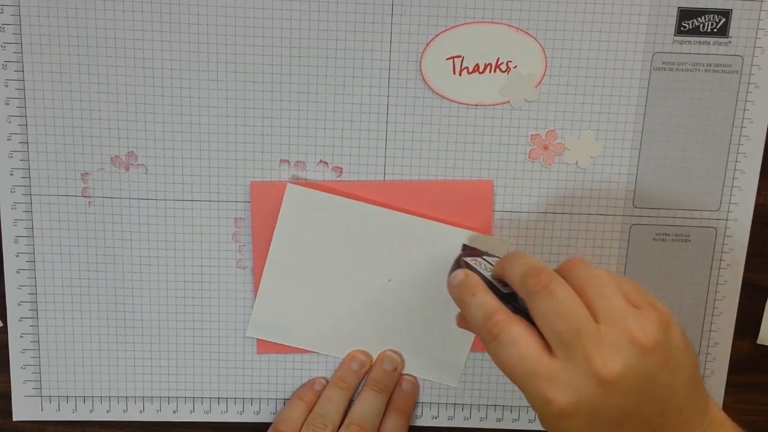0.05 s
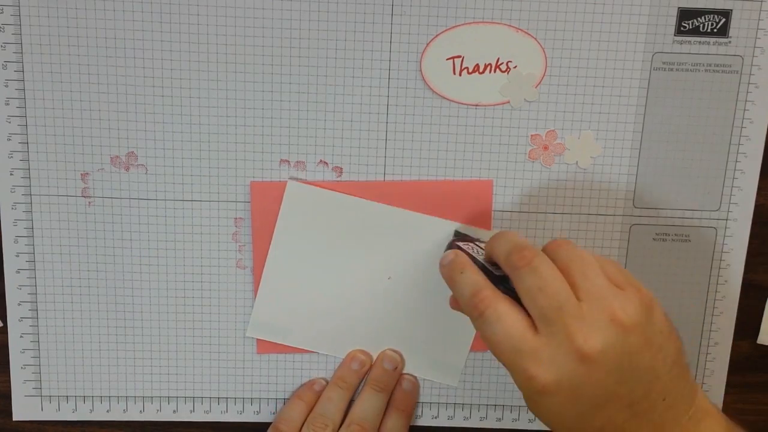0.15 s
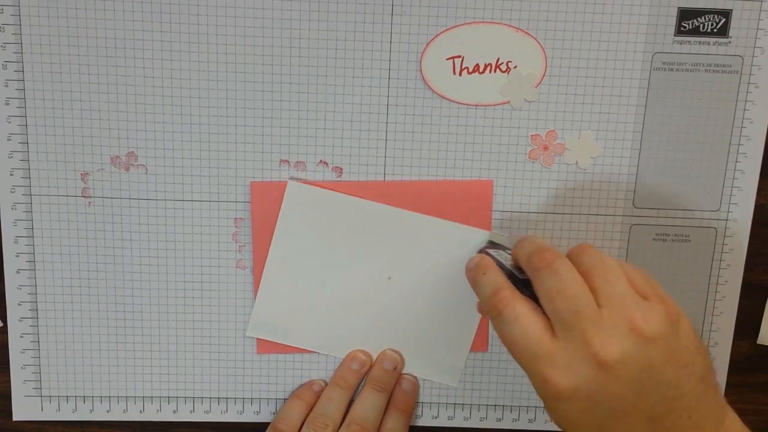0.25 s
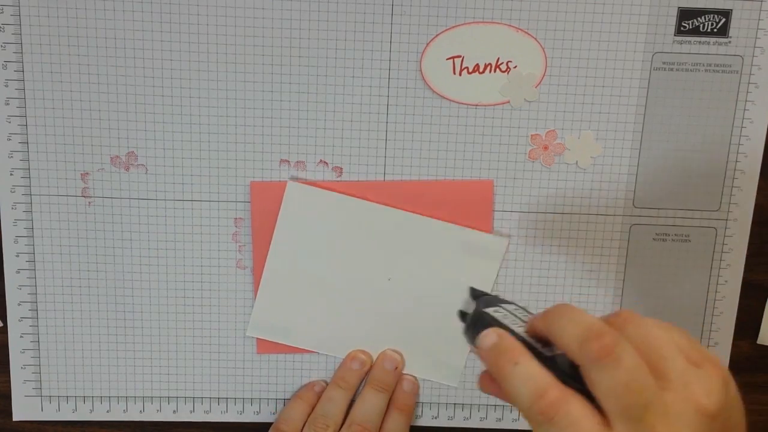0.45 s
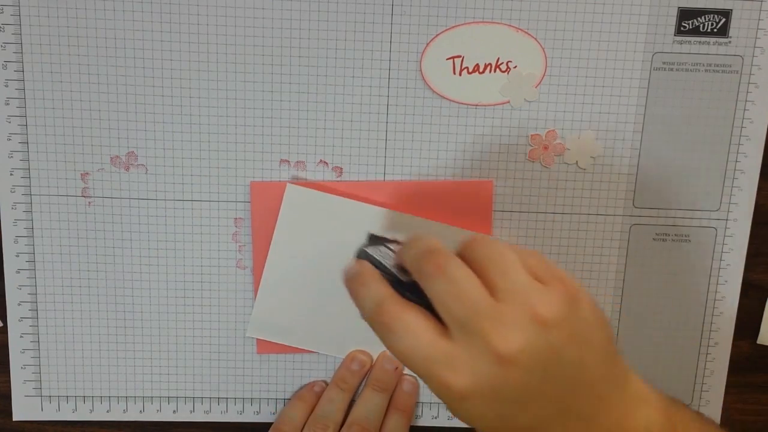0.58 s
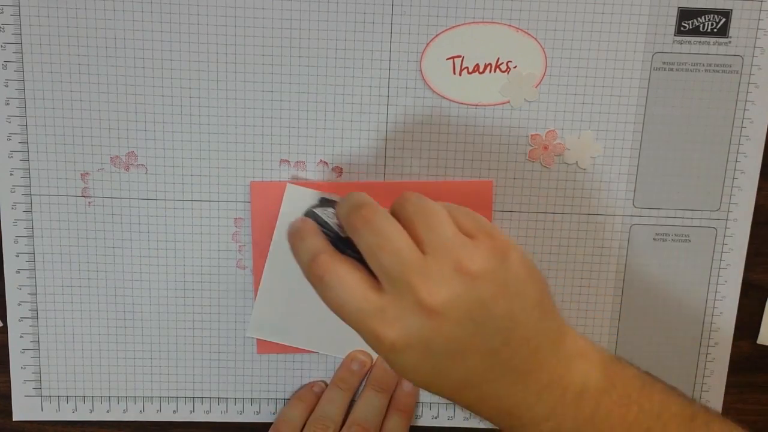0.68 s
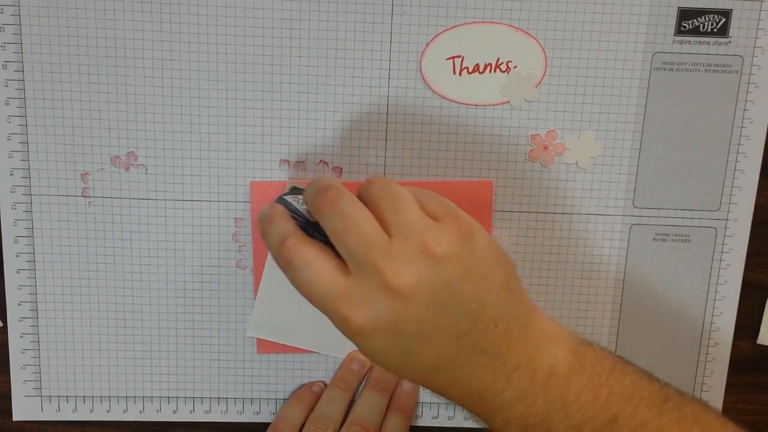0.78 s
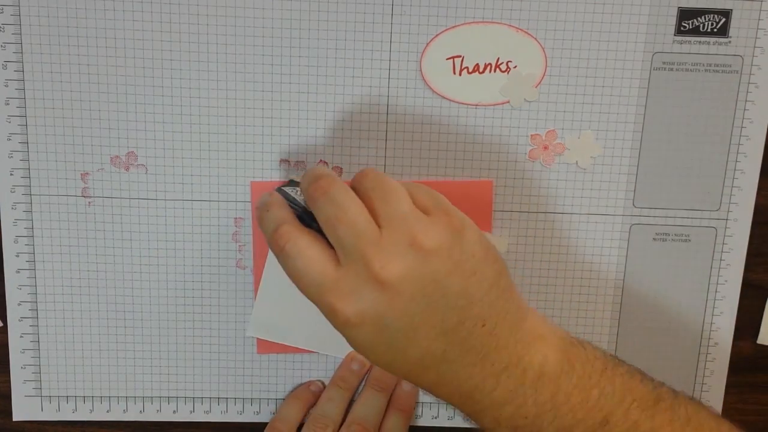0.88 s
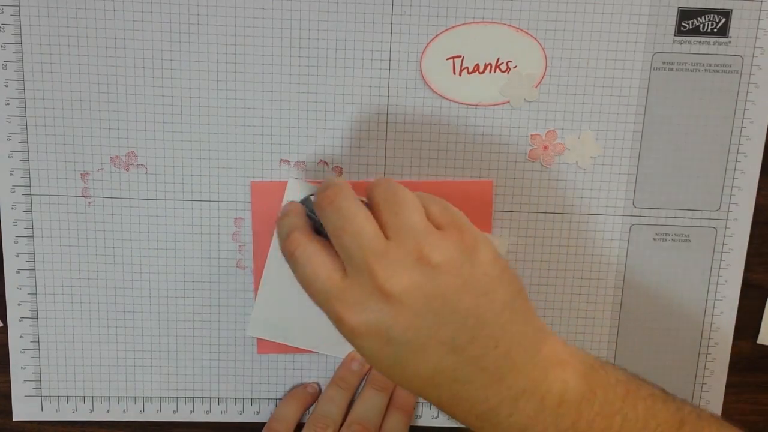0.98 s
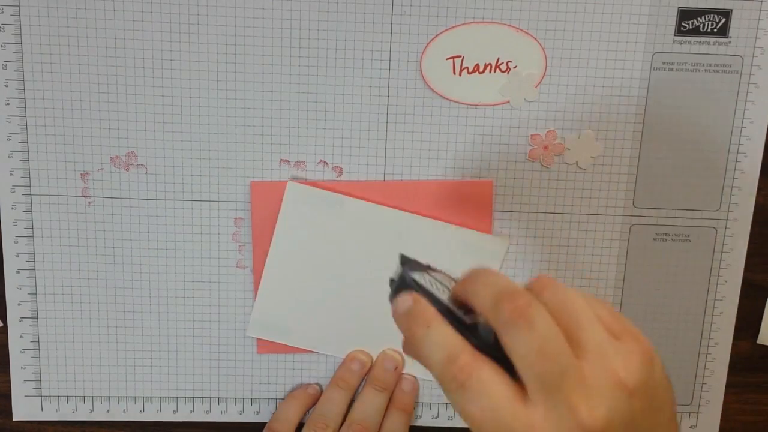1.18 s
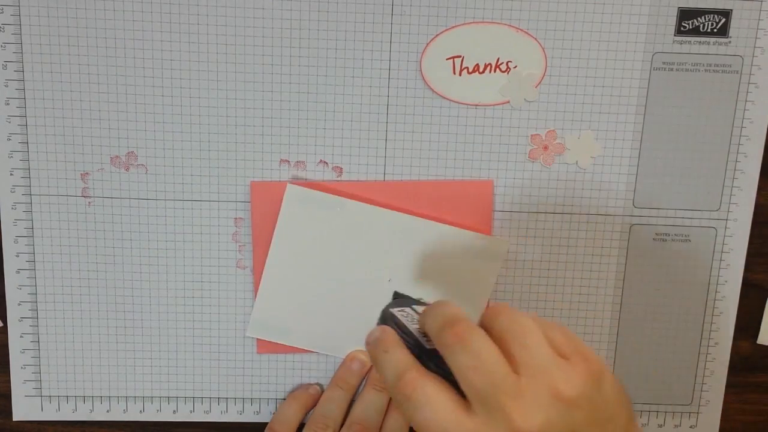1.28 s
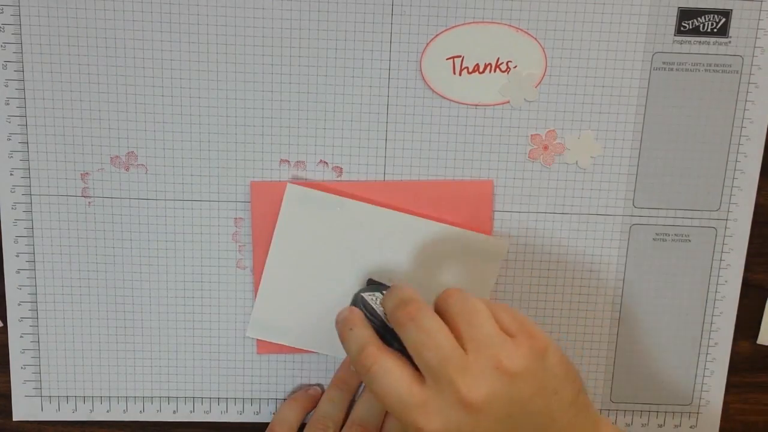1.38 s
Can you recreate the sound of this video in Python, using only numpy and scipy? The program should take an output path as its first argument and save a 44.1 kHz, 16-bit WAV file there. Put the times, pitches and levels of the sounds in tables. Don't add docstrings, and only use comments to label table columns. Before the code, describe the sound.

Close up, a glue tape runner presses down with a dull table thump and zips with hard dense ticks, lifts with a soft scuff and tiny rattles, then makes a second, somewhat softer stroke in a small room.

```python
import sys
import numpy as np
from scipy import signal
from scipy.fft import rfft, irfft, next_fast_len
from scipy.io import wavfile
from scipy.ndimage import uniform_filter1d

SR = 44100
rng = np.random.default_rng(int(sys.argv[2]) if len(sys.argv) > 2 else 0)


def voltage_ratio(level):
    return 10 ** (np.asarray(level, float) / 20)


def generate_wav(signal):
    frames = np.transpose(np.atleast_2d(signal))
    scaled = np.clip(frames, -1, 1) * 32767
    pcm = np.round(scaled).astype(np.int16)
    wavfile.write(sys.argv[1], SR, pcm)


N = 63945

# hz, level_db (per Hz)
GLUE_SPECTRUM = [(300, -41.5), (1200, -17.5), (1600, -1), (2700, -3), (6600, -1), (10000, -10),
                 (15400, -21.5), (16000, -48.5)]


def read(points, hz):
    f, value = np.transpose(points)
    return np.interp(np.log(hz + 1), np.log(f + 1), value)


def curve(points):
    return voltage_ratio(np.interp(np.arange(N) / SR, *np.transpose(points), left=-120, right=-120))


def evened(x):
    return x / np.sqrt(np.mean(x ** 2) + 1e-20)


def add(mix, s, sound):
    part = mix[round(s * SR):][:len(sound)]
    part += sound[:len(part)]


def colour(x, db_points):
    hz = np.fft.rfftfreq(4096, 1 / SR)
    half = np.log(voltage_ratio(read(db_points, hz)))
    full = np.concatenate([half, half[-2:0:-1]])
    taps = np.fft.ifft(np.exp(full - 1j * signal.hilbert(full).imag)).real[:2048]
    return signal.oaconvolve(x, taps)[:len(x)]


def resonate(x, hz, width_hz):
    turn = np.exp(2j * np.pi * hz * np.arange(len(x)) / SR)
    r = np.exp(-np.pi * width_hz / SR)
    return 2 * (turn * signal.lfilter([1 - r], [1, -r], x / turn)).real


def ding(hz, db, t60, rise):
    t = np.arange(5000) / SR
    return voltage_ratio(db - 60 * t / t60) * np.minimum(t / rise, 1) * np.sin(2 * np.pi * hz * t)


def floor():
    # hz, level_db (per Hz)
    hiss = [(20, -22), (56, 3), (85, -6), (180, -5.5), (673, -15.5), (4000, -21), (7840, -16.5),
            (12600, -24.5), (15800, -22)]
    # hz, likeness (-1 to 1)
    likeness = [(60, 0.81), (240, 0.38), (950, 0.094), (3770, 0.091), (15000, 0.46)]
    level_db = -62.5
    frames, hz = N // 256 + 5, np.fft.rfftfreq(1024, 1 / SR)
    a, b, c, d = rng.standard_normal((frames, 513, 4)).T
    same = np.clip(read(likeness, hz), -1, 1)[:, None]
    left = a + 1j * b
    right = same * left + np.sqrt(1 - same ** 2) * (c + 1j * d)
    bands = np.array([left, right]) * voltage_ratio(read(hiss, hz))[:, None]
    noise = signal.istft(bands, nperseg=1024, noverlap=768)[1][:, :N]
    return voltage_ratio(level_db) * evened(noise) * voltage_ratio(np.array([[-1.5], [1.5]]))


def whine():
    # time_s, pitch_hz
    drift = [(0, 1561.5), (.6, 1559), (1.0, 1559), (1.25, 1542), (1.45, 1542)]
    # multiple, level_db
    overtones = [(4, -75), (5, -66.5), (6, -66.5), (7, -70.5), (8, -69), (9, -74.5), (10, -78)]
    left_db, waver_db = -30, 0.6
    mains_hz, mains_db = 59, -73
    t = np.arange(N) / SR
    turns = np.cumsum(np.interp(t, *np.transpose(drift))) / SR
    noise = rng.standard_normal((len(overtones), N))
    waver = [evened(uniform_filter1d(uniform_filter1d(v, 1500), 1500)) for v in noise]
    tone = np.zeros(N)
    for (k, db), w in zip(overtones, waver):
        tone += voltage_ratio(db + 5.0 + waver_db * w) * np.sin(2 * np.pi * (round(k) * turns + rng.random()))
    mains = voltage_ratio(mains_db + 3 + 2 * waver[0]) * np.sin(2 * np.pi * mains_hz * t)
    return tone * voltage_ratio(np.array([[left_db], [0]])) + mains


def room(x):
    # hz, t60_s
    decay = [(150, 1), (1000, 0.34), (3000, 0.34), (7000, 0.32), (14000, 0.28)]
    taps = np.zeros((2, SR // 2))
    at = np.arange(200, SR // 2 - 20, 20)
    at = at + rng.integers(0, 20, (2, len(at)))
    np.put_along_axis(taps, at, rng.choice([-1., 1.], at.shape), 1)
    hz, t, z = signal.stft(taps, SR, nperseg=256)
    tail = signal.istft(z * voltage_ratio(-60 * t / read(decay, hz)[:, None]), SR, nperseg=256)[1]
    return signal.fftconvolve(x[None], tail / np.linalg.norm(tail[0]), axes=1)[:, :N]


def pair(x):
    # hz, left_minus_right_db
    lean = [(200, 1.5), (1650, 3), (5000, 3.5), (7000, 1.5), (9000, -6), (15000, -3.5)]
    # hz, share (0 to 1)
    direct = [(700, 0.9), (1500, 0.8), (4000, 0.69), (9000, 0.74)]
    # hz, left_lead_rad
    lead = [(300, 0), (900, -.4), (1700, -1.7), (2600, -.6), (4500, -.8), (6800, -1.5), (12000, -1)]
    moves_per_s = 9
    taps = rng.standard_normal((2, 300)) * voltage_ratio(-60 * np.arange(300) / 300)
    size = next_fast_len(N + 4096)
    turn = np.pi * moves_per_s * np.arange(N) / SR
    hz, paths = np.fft.rfftfreq(size, 1 / SR), rfft(taps, size)
    parts = rfft(x * np.array([np.sin(turn), np.cos(turn)]), size)
    power = abs(paths) ** 2
    sideways = (paths / np.sqrt(power + 0.29 * np.mean(power)) * parts).sum(axis=0)
    c = np.sqrt(np.clip(read(direct, hz), 0, 1))
    tilt = voltage_ratio(read(lean, hz) / 2) * np.exp(.5j * read(lead, hz))
    both = rfft(x, size) * c + np.sqrt(1 - c ** 2) * sideways * [[1], [-1]]
    return irfft(both * [tilt, 1 / tilt], size)[:, :N]


def hand_scuff():
    # time_s, level_db
    brush = [
        (.39, -134),
        (.415, -45.5),
        (.45, -56.5),
        (.5, -54),
        (.56, -63),
        (.6, -90),
    ]
    # hz, level_db
    tone = [(60, -33), (110, 7), (230, 6), (330, 1.5), (500, 3), (700, -0.5), (1200, -16)]
    return curve(brush) * evened(colour(rng.standard_normal(N), tone))


def card():
    # start_s, level_db, pitch_hz, t60_s
    buckles = [(0.17, -54.5, 770, 0.065), (0.187, -41, 970, 0.022), (.1985, -41, 860, 0.0089),
               (.2152, -22.5, 930, 0.01), (.253, -39.5, 750, 0.019), (0.291, -46, 945, 0.034),
               (.358, -31.5, 846, 0.024), (.415, -32.5, 963, 0.021), (.492, -50, 695, 0.07),
               (0.906, -51, 986, 0.028), (0.924, -32.5, 1240, 0.066), (.923, -43, 670, 0.036),
               (0.9247, -28, 1673, 0.037), (.967, -36, 1720, .04), (.987, -32, 1690, 0.05),
               (1.012, -39.5, 727, 0.073), (1.078, -35, 807, 0.037)]
    out = np.zeros(N)
    for s, db, hz, t60 in buckles:
        add(out, s, ding(hz, db, t60, 0.0022))
    return out


def casing(x):
    # pitch_hz, width_hz, level_db
    shell = [(1250, 460, -2.5), (1720, 332, -1), (2640, 610, -6), (4260, 990, 4.5), (5140, 1100, -4),
             (6600, 502, 7.5), (7254, 1200, 2)]
    return sum((-1) ** k * voltage_ratio(db) * resonate(x, f, w) for k, (f, w, db) in enumerate(shell))


def spool_hum():
    # time_s, level_db
    spin = [(.915, -80), (.926, -44), (.945, -50), (.99, -46), (1.1, -50), (1.2, -57), (1.23, -66),
            (1.33, -72), (1.36, -100)]
    hz, width_hz = 1700, 60
    hum = resonate(resonate(rng.standard_normal(N), hz, width_hz), hz, 3 * width_hz)
    return curve(spin) * evened(hum)


def rattles():
    # start_s, peak_db, low_ring_hz, hub_ring_db, upper_rings_db
    knocks = [(.531, -41, 1630, -28, -28), (.542, -50, 1650, -20, -20), (.603, -54, 1700, -20, -20),
              (0.6105, -49, 1750, 1, -7), (.615, -58, 1700, -20, -20), (0.62, -52, 1650, -4, -4),
              (.651, -48, 1800, -20, -20), (0.6553, -31.5, 1790, -18, -24), (.6605, -43, 1800, -6, -15),
              (.67, -51, 1600, -15, -20), (.708, -52, 1720, -20, -20), (1.3462, -45, 1770, -14, 4)]
    # pitch_hz, level_db, t60_s
    spool = [(3700, -1, .016), (4400, -3, .018), (4900, -2, .012), (6200, -9, .01), (6750, -8, .01)]
    hub_hz, ring_t60_s, rise_s = 2700, 0.013, 0.0015
    out, t = np.zeros(N), np.arange(800) / SR
    for s, db, hz, hub_db, upper_db in knocks:
        add(out, s, ding(hz, db, ring_t60_s, rise_s))
        add(out, s, ding(hub_hz, db + hub_db, ring_t60_s, rise_s))
        for (f, g, t60), detune in zip(spool, rng.uniform(0.95, 1.01, len(spool))):
            add(out, s, ding(f * detune, db + upper_db + g, t60, rise_s))
        rustle = evened(casing(rng.standard_normal(800)))
        add(out, s, voltage_ratio(db + upper_db - 0.5 - 60 * t / 0.038) * rustle)
    return out


def drag():
    # time_s, level_db
    first = [
        (.165, -90),
        (.188, -54),
        (.2, -38.5),
        (.25, -46.5),
        (.27, -35.5),
        (.36, -31.5),
        (.372, -39.5),
        (.43, -41),
        (.56, -59),
    ]
    # time_s, level_db
    second = [
        (0.904, -56.5),
        (0.914, -51.5),
        (.998, -43),
        (1.004, -34.5),
        (1.081, -32),
        (1.105, -36.5),
        (1.139, -41.5),
        (1.24, -54),
        (1.32, -74),
    ]
    earlier_db, fall_db_per_s = -54.5, 368
    return curve(first) + curve(second) + voltage_ratio(earlier_db - fall_db_per_s * np.arange(N) / SR)


def table():
    # pitch_hz, level_db, t60_s
    modes = [(100, -8, .07), (112, -1, .11), (175, -3, .09), (225, -6, .08), (285, -5, .08),
             (480, -17, .05), (750, -16, .05)]
    # start_s, level_db
    thumps = [(0.188, -32), (0.196, -18), (0.207, -17.5), (0.258, -28), (0.272, -21.5), (0.314, -41),
              (0.352, -38), (0.413, -41), (0.91, -26), (0.921, -22), (0.989, -29.5), (1.037, -25),
              (1.077, -36), (1.166, -37.5), (1.22, -37)]
    thump_db, rumble_db = -11.5, -36.5
    t = np.arange(12000) / SR
    ring = sum(voltage_ratio(db - 60 * t / t60) * np.sin(2 * np.pi * hz * t) for hz, db, t60 in modes)
    ring = -ring / abs(ring).max()
    push = voltage_ratio(rumble_db) * drag() * rng.standard_normal(N)
    for s, db in thumps:
        add(push, s, voltage_ratio(db + thump_db) * np.hanning(40) / 20)
    return signal.oaconvolve(push, ring)[:N]


def peel():
    crackle_per_s, spread_db = 3300, 1
    wide_db, bright_power = 6.5, 1.58
    size = voltage_ratio(spread_db * np.minimum(rng.exponential(1, N), 4)) * rng.choice([-1., 1.], N)
    clumps = voltage_ratio(1.0 * evened(uniform_filter1d(rng.standard_normal(N), 150)))
    snaps = size * clumps * (rng.random(N) < crackle_per_s / SR)
    push = drag()
    bright = (push / push.max()) ** (bright_power - 1)
    return push * (evened(casing(snaps)) + voltage_ratio(wide_db) * bright * evened(colour(snaps, GLUE_SPECTRUM)))


def tooth_snaps():
    # start_s, peak_db
    snaps = [(0.2739, -13.5), (0.3233, -18), (0.3542, -11), (0.3979, -17), (.9232, -25), (1.019, -17),
             (1.0189, -20), (1.04, -15), (1.0429, -14), (1.0508, -23), (1.077, -16), (1.1097, -18),
             (1.1206, -19)]
    out, click = np.zeros(N), np.zeros(3000)
    click[0] = 1
    crack = evened(colour(click, GLUE_SPECTRUM)) + voltage_ratio(4.5) * evened(casing(click))
    for (s, db), sign in zip(snaps, rng.choice([-1., 1.], len(snaps))):
        add(out, s, sign * voltage_ratio(db) * crack / abs(crack).max())
    return out


def ticks():
    # start_s, peak_db, loudest_ring_hz, second_ring_hz, snap_db
    first = [(0.199, -19, 1450, 6750, -12), (0.2058, -24, 6940, 4600, -10), (0.2096, -19.5, 1670, 7250, -9),
             (0.215, -12, 1750, 6660, -1.5), (0.253, -18.5, 7330, 4300, -9), (0.2673, -12, 2210, 4620, -1),
             (0.274, -11.5, 6220, 6760, -5), (0.278, -14, 2540, 6800, -1), (0.2847, -28, 6160, 2500, -3),
             (0.2922, -9.5, 6800, 4090, -30), (0.302, -7.5, 6260, 1940, -13),
             (0.3135, -10.5, 4320, 1900, -28), (0.3242, -9.5, 3980, 2790, -16),
             (.332, -9, 4140, 2670, -2.5), (0.3401, -11, 4680, 7250, -0.5), (0.3476, -11, 4150, 2265, -1),
             (0.354, -5.5, 4150, 7000, -1), (0.362, -11.5, 5860, 2560, -6.5), (0.3965, -14, 4980, 6550, 3),
             (0.4148, -19.5, 1980, 4430, 9)]
    # start_s, peak_db, loudest_ring_hz, second_ring_hz, snap_db
    second = [(0.9119, -27.5, 1150, 4740, -21), (0.9192, -28, 1370, 8250, 6),
              (0.9223, -16, 1704, 6600, -7.5), (0.9259, -17, 5040, 1650, -3),
              (0.9288, -25.5, 7000, 1220, -1), (0.9516, -27, 1250, 8300, 3),
              (0.9671, -23.5, 2730, 7060, -16), (.983, -23, 6350, 1200, 0), (0.9855, -18, 1710, 7150, -15),
              (1.0042, -15, 5140, 6560, -12), (1.019, -15, 7050, 2580, -13), (1.0295, -18, 2860, 6600, -6),
              (1.0397, -13.5, 2500, 7230, -3), (1.0425, -10.5, 2370, 7370, -5),
              (1.0514, -13, 6900, 5200, -17), (1.0626, -12, 6870, 2450, -3), (1.0686, -14, 2460, 7100, 8),
              (1.0766, -11, 5650, 7100, -21), (1.0835, -17, 2560, 6100, 6), (1.091, -13.5, 5500, 6630, -12),
              (1.1, -18.5, 6600, 2240, -18), (1.1107, -13, 7460, 8370, -3.5), (1.1132, -18, 7230, 8430, -4),
              (1.1214, -23.5, 7000, 2480, 0)]
    burst_t60_s, tooth_t60_s = 0.036, 0.013
    tick_db, ring_db, second_db, wide_db = -3.5, -1.26, -4, -2
    out, t = np.zeros(N), np.arange(3000) / SR
    for s, db, hz, second_hz, snap_db in first + second:
        burst = rng.standard_normal(len(t)) * np.minimum(t / 0.00067, 1) * voltage_ratio(-60 * t / burst_t60_s)
        ring = ding(hz, 0, tooth_t60_s, 0.00074) + ding(second_hz, second_db, tooth_t60_s, 0.00055)
        snap = colour(burst * (0.27 + voltage_ratio(11.0 - 60 * t / 0.0015)), GLUE_SPECTRUM)
        tick = evened(casing(burst)) + voltage_ratio(ring_db) * evened(ring[:len(t)])
        tick += voltage_ratio(wide_db + snap_db) * evened(snap)
        add(out, s, voltage_ratio(db + tick_db) * tick / abs(tick).max())
    return out


def scene():
    runner = peel() + ticks() + tooth_snaps()
    small = rattles() + card() + spool_hum() + hand_scuff()
    low = signal.sosfilt(signal.butter(4, 96.3, "high", fs=SR, output="sos"), table())
    far = room(voltage_ratio(-5.5) * runner + voltage_ratio(-15) * small + voltage_ratio(-23.0) * low)
    near = pair(runner + small) + low * voltage_ratio(np.array([[.7], [-.7]]))
    return near + far + floor() + whine()


def low_pass(x):
    return signal.sosfilt(signal.butter(12, 15910, fs=SR, output="sos"), x)


def record(dry):
    dry = signal.sosfilt(signal.butter(2, 40, "high", fs=SR, output="sos"), dry)
    edge = signal.firwin(255, 15450, window=("kaiser", 8), fs=SR)
    dry = signal.oaconvolve(dry, edge[None], "same")
    return low_pass(dry)


dry = scene()
out = record(dry)
generate_wav(out)
```